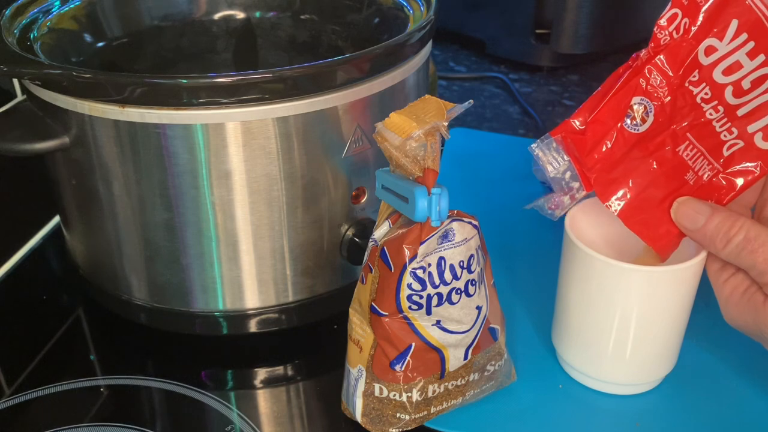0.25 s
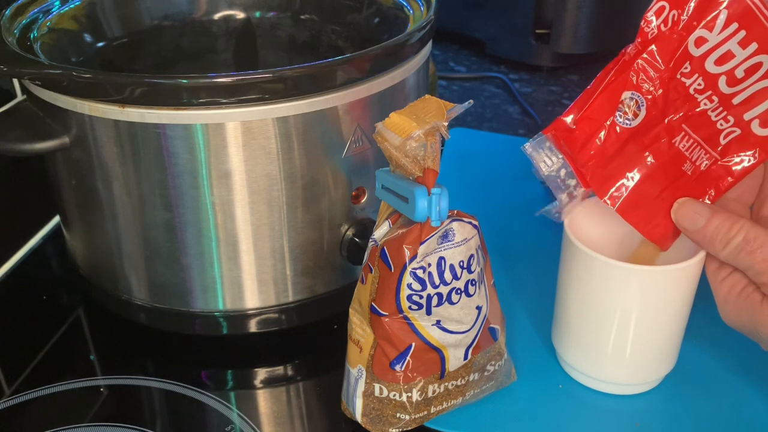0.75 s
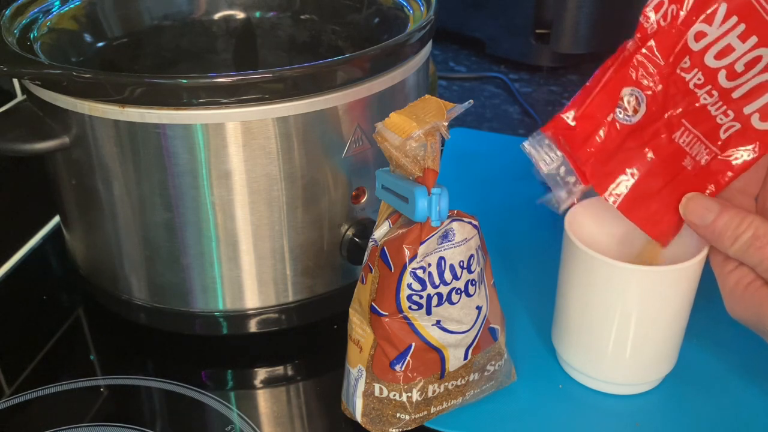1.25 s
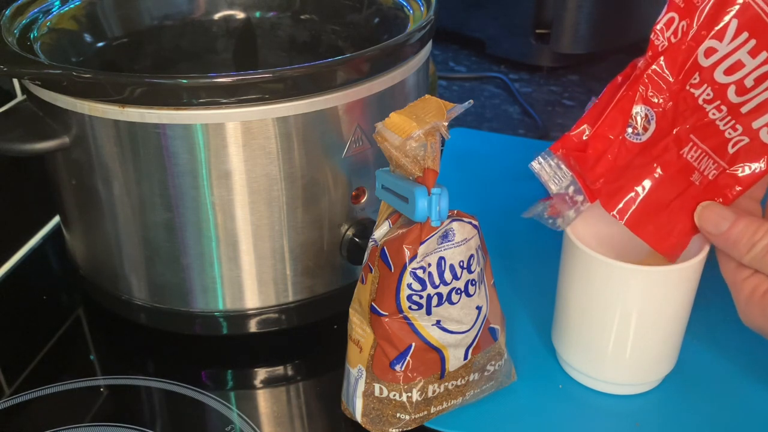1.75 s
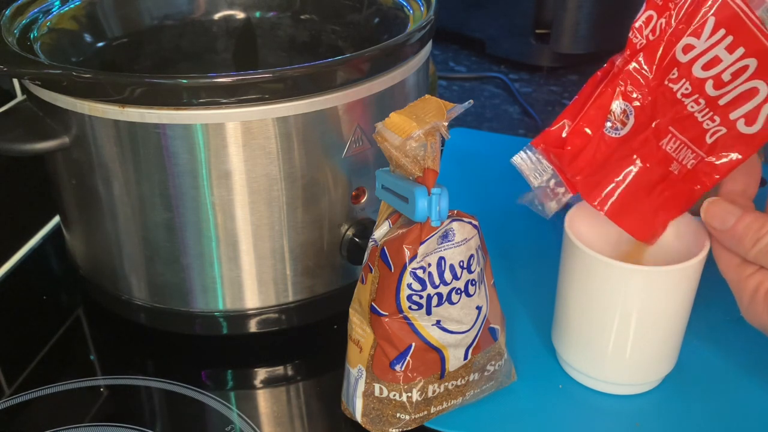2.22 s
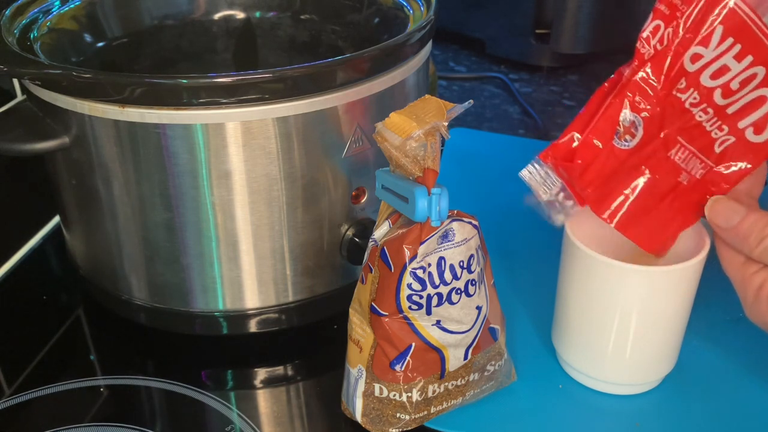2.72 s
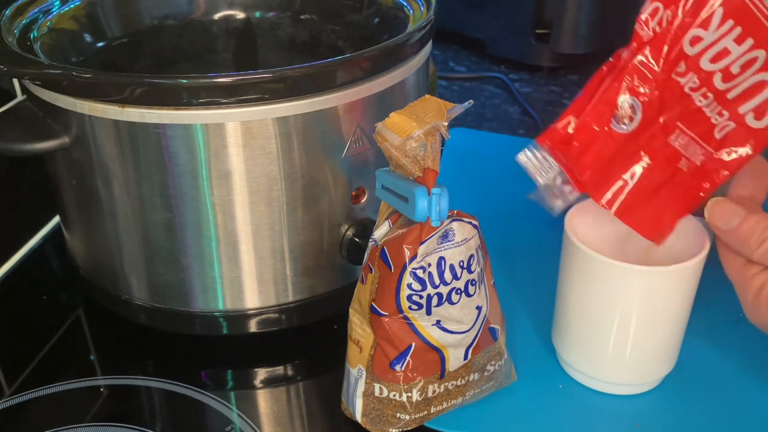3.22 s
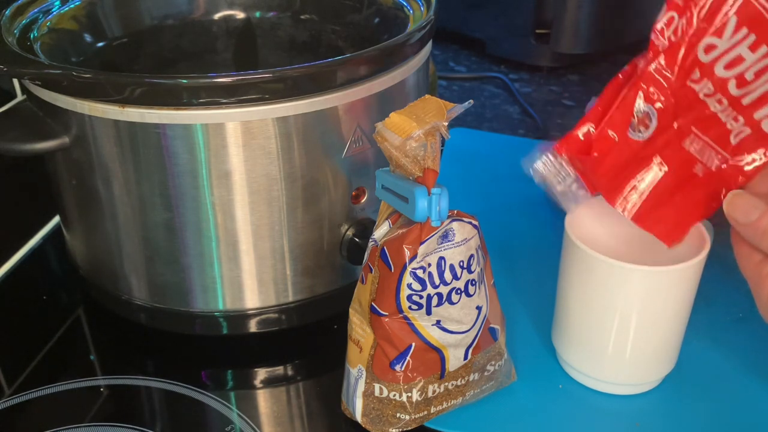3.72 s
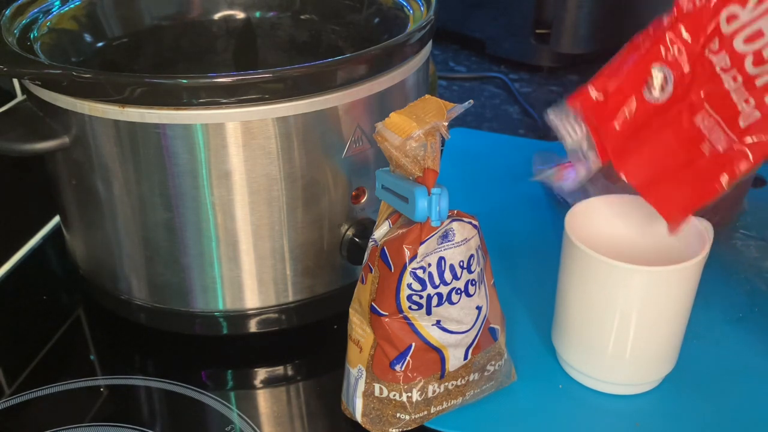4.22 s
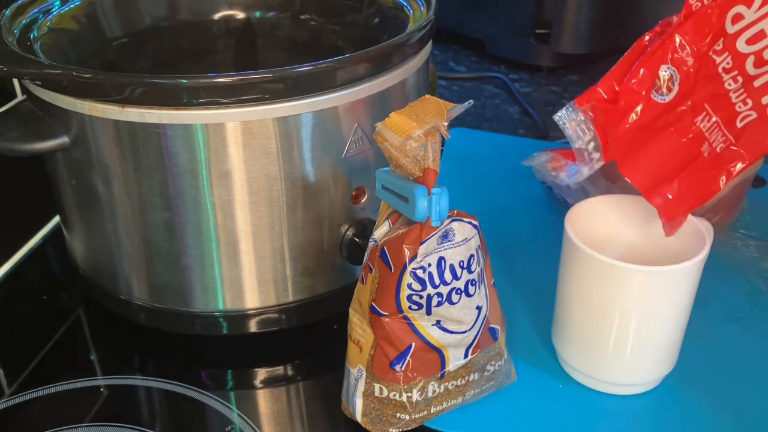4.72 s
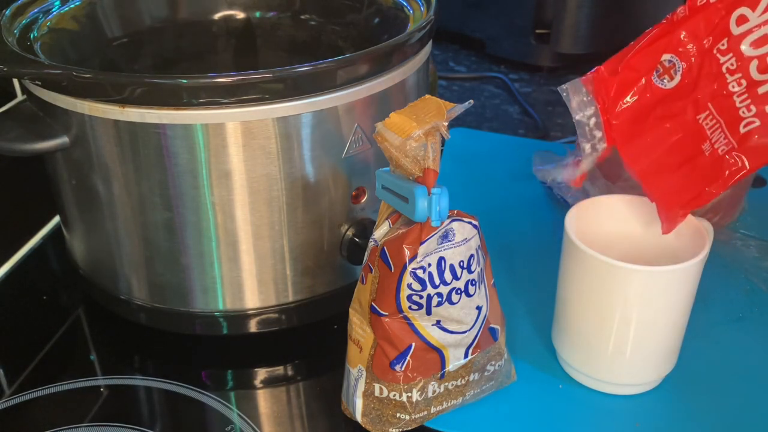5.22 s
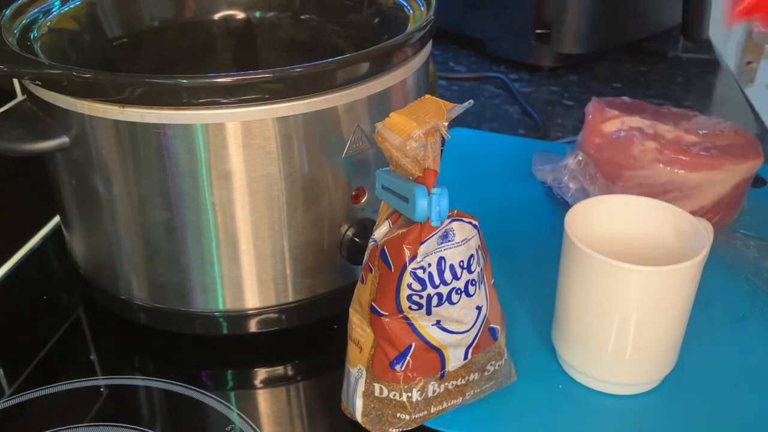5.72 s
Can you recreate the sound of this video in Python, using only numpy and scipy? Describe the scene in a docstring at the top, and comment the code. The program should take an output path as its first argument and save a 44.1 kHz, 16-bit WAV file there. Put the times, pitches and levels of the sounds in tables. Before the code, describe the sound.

Close stereo sound in a small kitchen: a steady sandy stream of sugar patters into a ceramic mug with a faint glassy ring, interrupted by a loud plastic snap near one second and a dull thump soon after. At about three seconds the pour stops and the bag crackles in uneven shakes with soft thumps, ending on a sharp rustle.

```python
"""For three seconds sugar patters and rings a ceramic mug; then a plastic bag crackles as it is shaken.
Single snaps and soft thumps punctuate the scene, and a hollow rush with a low rumble comes and goes.
Sugar and film are random impulse trains shaped by spectra and resonances; snaps and thumps are decaying
noise and sines; the rush is noise in wavering resonances. All is heard close by, in stereo, in a kitchen."""
import sys
import numpy as np
from scipy import signal
from scipy.fft import rfft, irfft, next_fast_len
from scipy.io import wavfile
from scipy.ndimage import uniform_filter1d

SR = 44100
rng = np.random.default_rng(int(sys.argv[2]) if len(sys.argv) > 2 else 0)


def to_wav(s):
    """Save 16-bit WAV."""
    ch = np.atleast_2d(s).T  # columns
    pcm = np.round(np.clip(ch, -1, 1) * 32767)  # PCM
    wavfile.write(sys.argv[1], SR, pcm.astype(np.int16))


N = 262659  # samples


def gain_of(db):
    """Decibel law: 20 dB is a factor of ten in amplitude."""
    return 10 ** (np.asarray(db) / 20)


def evened(x):
    """Normalization: scales the root mean square to 1."""
    return x / np.sqrt(np.mean(x ** 2) + 1e-20)


def read(points, hz, column=1):
    """Logarithmic frequency scale: interpolates a spectrum table along it."""
    table = np.transpose(points)
    return np.interp(np.log(hz + 1), np.log(table[0] + 1), table[column])


def curves(rows):
    """Piecewise-linear control: each column after the time, at every sample."""
    s, *columns = np.transpose(rows)
    return [np.interp(np.arange(N) / SR, s, column) for column in columns]


def colour(x, points):
    """Minimum-phase filtering: the log spectrum alone fixes a causal response."""
    hz = abs(np.fft.fftfreq(4096, 1 / SR))
    log_gain = np.log(gain_of(read(points, hz)))
    response = np.exp(np.conj(signal.hilbert(log_gain)))
    taps = np.fft.ifft(response).real[:2048]
    return signal.oaconvolve(x, taps)[:len(x)]


def ring(x, modes):
    """Modal superposition: parallel resonances, each (centre Hz, width Hz, gain dB)."""
    out = 0
    for hz, width, db in modes:
        b, a = signal.iirpeak(hz, hz / width, SR)
        out = out + gain_of(db) * signal.lfilter(b, a, x)
    return out


def resonate(x, hz, width):
    """Heterodyne resonance: shift the moving centre hz to zero, smooth, shift back."""
    turn = np.exp(2j * np.pi * np.cumsum(hz) / SR)
    pole = np.exp(-np.pi * width / SR)
    smooth = signal.lfilter([1 - pole], [1, -pole], x / turn)
    return 2 * (turn * smooth).real


def add(mix, s, sound):
    """Linear superposition: mixes a sound in at s seconds."""
    part = mix[round(s * SR):][:len(sound)]
    part += sound[:len(part)]


def patter(per_s, spread_db, clump_db, clump_s):
    """Shot noise: sparse impacts of random sign and size, louder in clumps."""
    hit = rng.random(N) < per_s / SR
    size = np.minimum(rng.exponential(1, N), 5)
    sign = rng.standard_normal(N)
    width = round(clump_s * SR)
    drift = uniform_filter1d(rng.standard_normal(N), width)
    clumps = evened(uniform_filter1d(drift, width))
    return evened(hit * sign * gain_of(spread_db * size + clump_db * clumps))


# Shakes of the bag. Each row: crest in seconds, change of level in dB.
SHAKE_ROWS = [(0.945, 3.5), (1.194, 5), (1.346, 6.5), (1.554, 4), (1.735, 3), (2.345, 6.5), (2.485, 6.5),
              (2.56, 3), (2.85, 0), (3.071, 7.5), (3.18, 4.5), (3.4, -3), (3.47, 10.5), (3.746, 11.5),
              (3.97, 8), (4.18, 3), (4.365, 4.5), (4.62, -1), (4.77, -4.5), (5.01, 10), (5.19, 9),
              (5.43, 4.5), (5.816, 16)]
SURGE_RISE_S, SURGE_FALL_S = 0.035, 0.056  # from the crest to 1/e of the change in dB


def surges():
    """Envelope modulation: each row raises or, if negative, lowers the level, and returns more slowly."""
    t = np.arange(N) / SR
    total_db = np.zeros(N)
    for s, db in SHAKE_ROWS:
        side = np.where(t < s, SURGE_RISE_S, SURGE_FALL_S)
        total_db += db * np.exp(-((t - s) / side) ** 2)
    return total_db


# Sugar stream between the shakes. Each row: time in seconds, level in dB.
FLOW_LEVELS = [(0, -43.5), (0.62, -40.5), (0.9, -39), (1.28, -41.5), (1.66, -40.5), (1.9, -41.5),
               (2.25, -42), (2.62, -39.5), (2.93, -44), (3.03, -44.5), (3.1, -42.5)]
# Spectrum of the crystal ticks. Each row: frequency in Hz, gain in dB.
CRYSTAL_SPECTRUM = [(300, -24), (900, -28.5), (1400, -14), (2200, -9), (3200, -7.5), (5100, 0), (6300, -6),
                    (7200, 0), (8400, -0.5), (9500, -2), (11500, -2.5), (14000, -9.5), (16500, -8)]
# Resonances of the mug's wall and air. Each row: centre in Hz, width in Hz, gain in dB.
MUG_MODES = [(842, 97, -10.5), (968, 260, -12.5), (1300, 210, -7.5), (1506, 230, -5), (1663, 99, -6.5),
             (2050, 135, 4.5), (2360, 140, -0.5), (2510, 85, 7.5), (2720, 180, -13), (3100, 250, -7.5),
             (3720, 120, -12), (4000, 110, -27), (4530, 94, -22), (4890, 130, -16), (7700, 200, -10.5)]
RING_DB, RING_FADE_DB_PER_S = -7, 2  # ringing re ticks at the start, and its fade as the heap grows


def sugar():
    """Impact excitation: crystals tick on the heap, and some ring the mug's modes."""
    t = np.arange(N) / SR
    flow_db, = curves(FLOW_LEVELS)
    stop = np.clip((FLOW_LEVELS[-1][0] - t) / 0.12, 0, 1)
    ticks = evened(colour(patter(9000, 1.0, 1.0, 0.045), CRYSTAL_SPECTRUM))
    rings = evened(ring(patter(5000, 0.42, 0.24, 0.0033), MUG_MODES))
    stream = ticks + gain_of(RING_DB - RING_FADE_DB_PER_S * t) * rings
    return gain_of(flow_db + surges()) * stop * stream


# Levels before the shakes act. Each row: time in seconds, hollow rush in dB, rumble under it in dB.
RUSH_LEVELS = [(0, -74, -65), (0.4, -78, -76), (0.75, -67, -70.5), (0.95, -53.5, -66), (1.02, -63.5, -72),
               (1.3, -67, -64), (1.56, -56, -62), (1.83, -61.5, -67), (1.9, -99, -98), (2.2, -82, -76),
               (2.58, -69.5, -62), (2.85, -63.5, -64.5), (3.36, -71.5, -74), (3.42, -92, -78),
               (3.51, -103, -87), (3.55, -62, -81), (3.66, -68, -69.5), (3.76, -51.5, -52.5),
               (3.88, -59, -68), (3.95, -59, -55), (4.1, -59, -67), (4.26, -66, -70), (4.31, -59, -72),
               (4.52, -65, -68.5), (4.68, -103, -77), (4.8, -62.5, -75), (4.94, -93, -75), (5.0, -75, -56),
               (5.08, -65, -71), (5.17, -58.5, -66), (5.19, -52, -57), (5.24, -58.5, -65), (5.3, -59, -68),
               (5.52, -57, -71), (5.63, -64, -67.5), (5.8, -62, -69), (5.95, -58.5, -50)]
# The hollow's lowest resonance wavers. Each row: time in seconds, lowest resonance in Hz.
HOLLOW_PITCH = [(0.0, 393), (0.23, 454), (0.28, 424), (1.34, 466), (1.37, 367), (1.92, 437), (2.95, 405),
                (3.08, 365), (3.15, 470), (3.21, 410), (3.45, 504), (3.48, 430), (3.66, 408), (4.74, 370),
                (4.81, 456), (5.24, 375), (5.57, 424), (5.63, 388), (5.93, 450), (5.95, 454)]
# Each row: multiple of the lowest resonance, width of the first filter pass in Hz, gain in dB.
HOLLOW_MODES = [(0.998, 142, 2.5), (1.9, 137, -1.5), (3.1, 300, -9.5)]
# Thin upper part of the rush. Each row: frequency in Hz, gain in dB.
AIR_SPECTRUM = [(700, -20), (1300, -2), (2500, -1), (4500, 0), (5900, -2), (7000, -12), (16000, -30)]
RUSH_PER_DB = -0.21  # dB of rush per dB of surge: it moves against the surge


def rush():
    """Cavity resonance: noise in wavering modes, with thin hiss above and lumpy rumble below."""
    rush_db, rumble_db = curves(RUSH_LEVELS)
    low_hz, = curves(HOLLOW_PITCH)
    flow = patter(20000, 0.69, 2.3, 0.02)
    hollow = np.zeros(N)
    for multiple, width, db in HOLLOW_MODES:
        once = resonate(flow, multiple * low_hz, width)
        hollow += gain_of(db) * resonate(once, multiple * low_hz, 2 * width)
    airy = evened(hollow) + gain_of(-5.0) * evened(colour(flow, AIR_SPECTRUM))
    lumps = patter(20000, 0.45, 7.5, 0.034)
    low = ring(lumps, [(63.0, 81, 20.0), (124, 88, -23.0)])
    rumble = evened(ring(low, [(80.6, 260, 0)]))
    return gain_of(rush_db + RUSH_PER_DB * surges()) * airy + gain_of(rumble_db) * rumble


# Soft thumps through the counter. Each row: start in seconds, swing in dB, nominal pitch in Hz
# (the swing sags from 1.52 to 0.9 of it), t60 in seconds (at least 0.03 is used), knock in dB, tick in dB.
THUMP_ROWS = [(0.843, -54, 144, 0.077, -42.5, -27), (0.9314, -66, 140, 0.022, -35, -20),
              (1.39, -31, 111.3, 0.099, -40, -47), (1.415, -40, 113, 0.095, -47, -60),
              (1.439, -50, 110, 0.069, -58, -57), (2.469, -53, 89.5, 0.092, -54, -56),
              (3.16, -47, 117, 0.17, -60, -64), (3.538, -61, 92.5, 0.15, -52.5, -60),
              (3.593, -55, 74, 0.13, -80, -60), (3.721, -43, 93, 0.11, -60, -49),
              (3.941, -42, 81, 0.19, -42.5, -39), (3.982, -35.5, 71, 0.15, -54, -60),
              (4.142, -38, 97, 0.11, -45, -36), (4.182, -40, 77.4, 0.17, -53, -60),
              (4.342, -42.5, 120.4, 0.23, -48.5, -37), (4.99, -60, 209.4, 0.48, -58.5, -47),
              (5.43, -54, 146.5, 0.4, -72, -51), (5.888, -48, 112, 0.2, -55.5, -60)]
KNOCK_SHARE = 0.81  # t60 of the knock re the swing


def thumps():
    """Damped oscillation: a low swing sags in pitch, with a dull knock and short tick at its start."""
    out, t = np.zeros(N), np.arange(13000) / SR
    noise = rng.standard_normal((len(THUMP_ROWS), len(t)))
    for (s, db, hz, t60, knock_db, tick_db), puff in zip(THUMP_ROWS, noise):
        t60 = max(t60, .03)
        turns = np.cumsum(hz * (.9 + 0.62 * np.exp(-t / 0.0087))) / SR
        swing = np.sin(2 * np.pi * turns)
        swing += 0.83 * np.sin(2 * np.pi * 0.58 * turns)
        swing += 0.2 * np.sin(2 * np.pi * 1.4 * turns)
        swing *= (1 - np.exp(-t / 0.002)) ** 2 * gain_of(db - 60 * t / t60)
        knock = evened(ring(ring(puff, [(400, 520, 0)]), [(380, 410, 0)]))
        knock *= (1 - np.exp(-t / 0.00046)) * gain_of(knock_db - 60 * t / (KNOCK_SHARE * t60))
        tick = evened(ring(puff, [(1205, 26, 66.0), (2210, 280, 4.4)]))
        tick *= gain_of(tick_db - 60 * t / 0.02)
        add(out, s, swing + knock + tick)
    return out


# Snaps of the film. Each row: start in seconds, rms level of the first two milliseconds in dB,
# panel pitch in Hz, peak of the crack re the panel in dB, fray re the first crack in dB.
SNAP_ROWS = [(0.9299, -15, 2440, 6, -14.5), (0.9333, -25.5, 2320, 13, -15), (0.936, -30, 1800, -8, 0),
             (1.305, -32, 1970, -7, 6), (2.5472, -30.5, 2630, 15, 12), (2.9576, -35.5, 2620, 24, -3),
             (3.061, -39, 2320, 8, 8), (3.099, -45, 2500, 7, -14), (3.15, -38, 2590, 15, -7),
             (3.199, -46, 1980, 0, -2), (3.2304, -47, 3780, 1, -2), (3.252, -42, 1930, -4, -9),
             (3.274, -43, 1970, -11, -6), (3.283, -42, 1400, -6.5, -6), (3.338, -43, 3520, 0, 8),
             (3.356, -49, 3000, 17, 0), (3.389, -38.5, 2670, 8, -3), (3.411, -46, 4200, -2, -6),
             (3.421, -45, 2650, 2, -4), (3.4456, -40.5, 2560, 3, 1), (3.4525, -44, 4400, -10, -2),
             (3.46, -40, 4020, 8, -12), (3.482, -46, 2500, 17, -6), (3.511, -48, 2500, 18, -14),
             (3.521, -43, 2500, 21, -2), (3.5448, -44, 3000, 29, -11), (3.59, -47.5, 2560, 28, -8),
             (3.671, -47.5, 1150, 11, -6), (3.687, -60, 1300, -2, -8), (3.7207, -44, 1280, 2.5, -2),
             (3.76, -36.5, 2530, 7, -34), (3.919, -49, 1980, -8, -8), (3.9398, -35.5, 1340, 2.5, -8),
             (3.971, -34, 2450, 32, -8), (4.092, -53, 2500, 11, 0), (4.139, -40.5, 2060, 3, -3),
             (4.1708, -38, 3720, 20, 12), (4.345, -34.5, 1260, 4.5, 5), (4.395, -41, 1390, 11, -4),
             (4.454, -39, 2360, 24, -8), (4.5438, -47.5, 2050, 25, 13), (4.6037, -46.5, 1270, 22, 17),
             (4.67, -64, 3060, 18, -12), (4.689, -53, 2500, 13, 6), (4.7605, -43, 2510, 19, -7),
             (4.896, -48, 2080, 27, -12), (4.945, -56, 2500, 15, -6), (4.99, -50, 2530, 3, -4),
             (5.092, -52.5, 1060, -19, -6), (5.116, -47.5, 1280, 6.5, 8), (5.1768, -39, 1600, 12, -7),
             (5.237, -42.5, 1430, -1.5, 2), (5.3036, -46, 1190, 12, -15), (5.334, -52, 1250, 9, -2),
             (5.416, -59, 2480, 18, -10), (5.433, -48.5, 1370, 10, -3), (5.47, -55, 2460, -1, 3),
             (5.507, -52, 1100, -1, 0), (5.685, -53, 1580, 29, -4), (5.717, -50, 1320, 3, -14),
             (5.778, -58, 1600, -10, -4), (5.806, -27.5, 7350, 1, 20)]
# Spectrum of the plastic film, also used for its creases. Each row: frequency in Hz, gain in dB.
FILM_SPECTRUM = [(300, -28), (900, -12), (1400, -4), (3000, -5), (5000, -4), (6200, -6), (8400, 0),
                 (10300, -1), (12400, -5), (16500, -12)]
SNAP_RISE_S, FRAY_T60_S = 0.0011, 0.036  # frayed end of the crack
PANEL_T60_S = 0.0037  # exponential part of the panel's decay
OVERTONE, OVERTONE_DB = 1.897, -6.5  # second mode of the panel re the first


def snaps():
    """Snap-through buckling: a crease flips with a frayed crack and the panel behind it shudders."""
    out, t = np.zeros(N), np.arange(2600) / SR
    noise = rng.standard_normal((len(SNAP_ROWS), len(t)))
    for (s, db, hz, bright_db, fray_db), puff in zip(SNAP_ROWS, noise):
        flip = np.sign(puff) * gain_of(-60 * t / .004) * (1 - np.exp(-t / .0002))
        fray = puff * (1 - np.exp(-t / SNAP_RISE_S)) * gain_of(fray_db - 60 * t / FRAY_T60_S)
        crack = colour(flip + fray, FILM_SPECTRUM)
        shudder = np.sin(2 * np.pi * hz * t)
        shudder += gain_of(OVERTONE_DB) * np.sin(2 * np.pi * OVERTONE * hz * t)
        panel = shudder * t ** 2 * gain_of(-60 * t / PANEL_T60_S)
        both = gain_of(bright_db) * crack / abs(crack).max() + panel / abs(panel).max()
        onset_rms = np.sqrt(np.mean(both[:80] ** 2))
        add(out, s, gain_of(db) * both / onset_rms)
    return out


def creases(per_s, spread_db, clump_db, cycles, count):
    """Granular synthesis: tiny folds, each a few cycles at one of count pitches."""
    t, out = np.arange(300) / SR, np.zeros(N)
    drive = patter(per_s, spread_db, clump_db, 0.0031)
    which = rng.integers(0, count, N)
    for k, hz in enumerate(np.geomspace(1800, 13000, count)):
        fold = evened(np.sin(2 * np.pi * hz * t) * np.exp(-t * hz / cycles))
        out += signal.oaconvolve(drive * (which == k), gain_of(read(FILM_SPECTRUM, hz)) * fold)[:N]
    return evened(out)


# Film flexing and loose crystals sliding in it, between shakes. Each row: time in seconds, level in dB.
FLEX_LEVELS = [(2.9, -66), (3.12, -51), (3.22, -53), (3.31, -50.5), (3.41, -46), (3.44, -66), (3.46, -65),
               (3.53, -56), (3.66, -64.5), (3.9, -56.5), (4.1, -47), (4.24, -45.5), (4.33, -48.5),
               (4.4, -49.5), (4.5, -53), (4.8, -51), (4.95, -69), (5.1, -76.5), (5.4, -60), (5.61, -76),
               (5.72, -57.5), (5.79, -68.5), (5.86, -62), (5.95, -57)]
DULL_DB, DULL_PER_DB = -2, 0.1  # gain below 2200 Hz, and its rise per dB of surge


def bag():
    """Crackling noise: small creases crackle within a steadier, stronger slide of crystals."""
    surge_db = surges()
    flex_db, = curves(FLEX_LEVELS)
    dull_db = DULL_DB + DULL_PER_DB * surge_db
    start = np.clip((np.arange(N) / SR - FLEX_LEVELS[0][0]) / 0.26, 0, 1)
    slide = evened(colour(patter(12000, 0.57, 2.5, 0.012), FILM_SPECTRUM))
    crackle = creases(800, 2., 3.5, 1.5, count=14)
    film = evened(gain_of(-5) * crackle + slide)
    dull = signal.lfilter(*signal.butter(2, 2200, fs=SR), film)
    return gain_of(flex_db + surge_db) * start * (film + (gain_of(dull_db) - 1) * dull)


# Stepped phase lead of the right channel over the left. Each row: frequency in Hz, lead in radians.
CHANNEL_LEAD = [(0, 0), (1800, .85), (3500, .7), (4300, 1.3), (5500, 3.05), (6850, 6.2), (7300, 6.55),
                (8750, 9.3), (9450, 9.55), (11000, 12.4), (11750, 12.7), (13200, 15.55), (14200, 15.85),
                (15250, 18.75), (22050, 19)]
# Level of the left channel over the right. Each row: frequency in Hz, difference in dB.
CHANNEL_TILT = [(40, -1.3), (120, 0), (330, -2), (600, .5), (1170, 3.5), (2500, 3), (4200, .5), (5200, -1),
                (8000, 0)]


def stereo(x):
    """Interchannel phase and level: the right leads by a stepped phase; balance varies with frequency."""
    size = next_fast_len(N + 1024)
    hz = np.fft.rfftfreq(size, 1 / SR)
    lead = np.interp(hz, *np.transpose(CHANNEL_LEAD))
    half = gain_of(read(CHANNEL_TILT, hz) / 2) * np.exp(-.5j * lead)  # left gets half, right its inverse
    return irfft(rfft(x, size) * np.array([half, 1 / half]), size)[:, :N]


# Kitchen reflections. Each row: frequency in Hz, level re the sound sent to them in dB, t60 in seconds.
KITCHEN_BANDS = [(350, -5, .2), (700, -3, .15), (1500, -6, .1), (3300, -2, .09), (4300, -2, .09),
                 (5300, -5, .09), (6200, -1, .09), (7000, -10, .09), (9000, -11, .08), (16000, -9, .07)]


def kitchen(x):
    """Reverberation: sparse echoes decay by band; twelve sets of paths fade into one another in turn."""
    taps = np.zeros((12, 2, 12000))  # sets of paths, channels, samples
    at = np.arange(60, 11980, 20) + rng.integers(0, 20, (12, 2, 596))
    np.put_along_axis(taps, at, rng.choice([-1., 1.], at.shape), 2)
    hz, t, z = signal.stft(taps, SR, nperseg=128)
    t60 = np.maximum(read(KITCHEN_BANDS, hz, column=2), .03)
    band_gain = gain_of(read(KITCHEN_BANDS, hz))
    decay = gain_of(-60 * t / t60[:, None])
    decay /= np.linalg.norm(decay, axis=1)[:, None]  # the same energy in every band
    tails = signal.istft(z * decay * band_gain[:, None], SR, nperseg=128)[1]
    tails /= np.sqrt(np.mean(np.sum(tails ** 2, 2)) / np.mean(band_gain ** 2))
    place = np.arange(N) / SR * 14 % len(tails)  # 14 sets a second
    out = np.zeros((2, N))
    for k, tail in enumerate(tails):
        apart = np.minimum(abs(place - k), len(tails) - abs(place - k))
        fade = np.cos(np.pi / 2 * np.minimum(apart, 1))
        out += signal.oaconvolve((x * fade)[None], tail, axes=1)[:, :N]
    return out


SPREAD_DB, HITS_WET_DB = 2, -5  # sent to the reflections: wide, steady sounds; single hits


def scene():
    """Direct and reverberant fields: deep bass comes through the counter, without reflections."""
    steady = sugar() + rush() + bag()
    hits = thumps() + snaps()
    sent = gain_of(SPREAD_DB) * steady + gain_of(HITS_WET_DB) * hits
    airborne = signal.sosfilt(signal.butter(2, 130, "high", fs=SR, output="sos"), sent)
    return stereo(steady + hits) + kitchen(airborne)


EDGE_HZ = 15720  # upper band limit


def record(dry):
    """Band limitation: a bass roll-off at 50 Hz and a steep upper edge."""
    lean = signal.sosfilt(signal.butter(4, 50, "high", fs=SR, output="sos"), dry)
    edge = signal.firwin(511, EDGE_HZ, window=("kaiser", 9), fs=SR)
    return signal.oaconvolve(lean, edge[None], "same")


dry = scene()
out = record(dry)
to_wav(out)
```